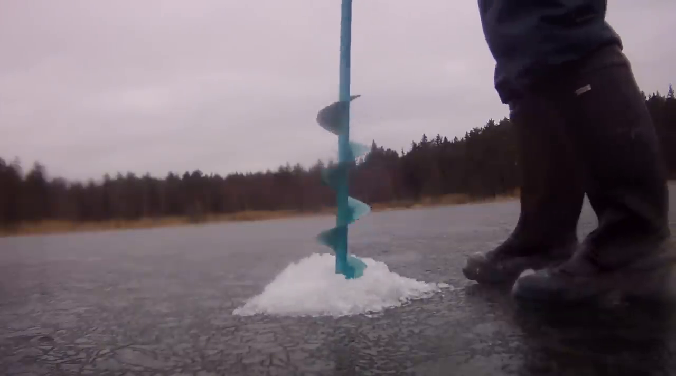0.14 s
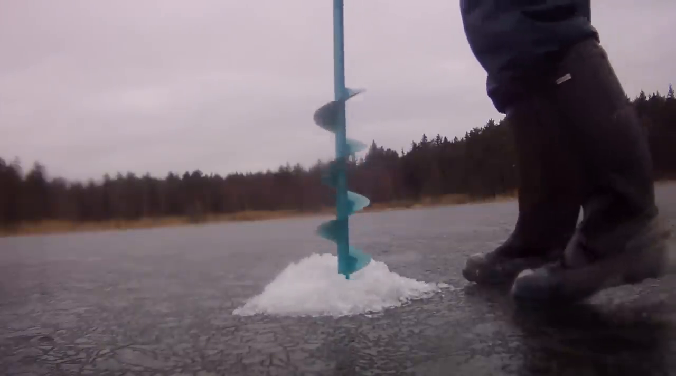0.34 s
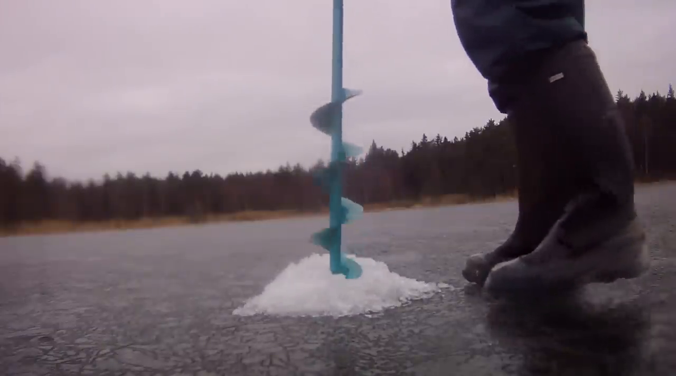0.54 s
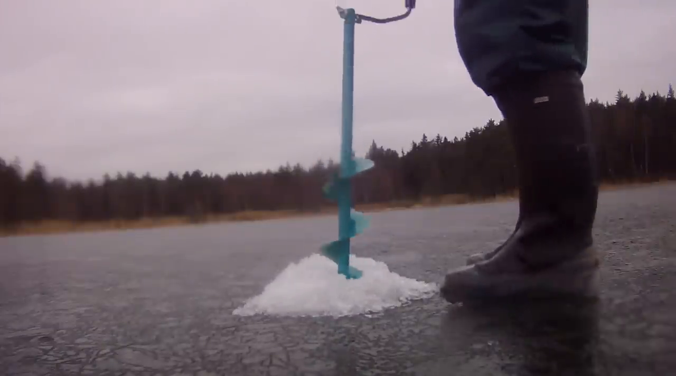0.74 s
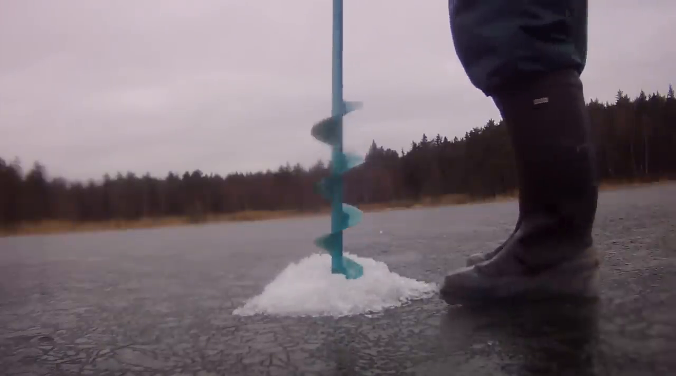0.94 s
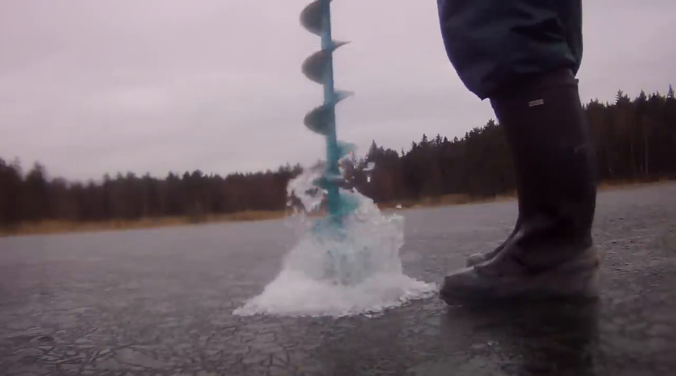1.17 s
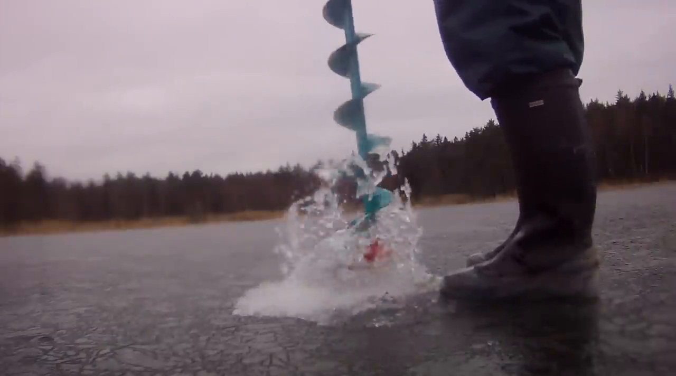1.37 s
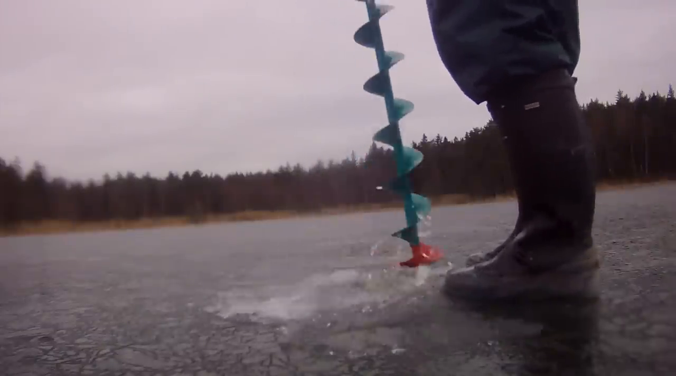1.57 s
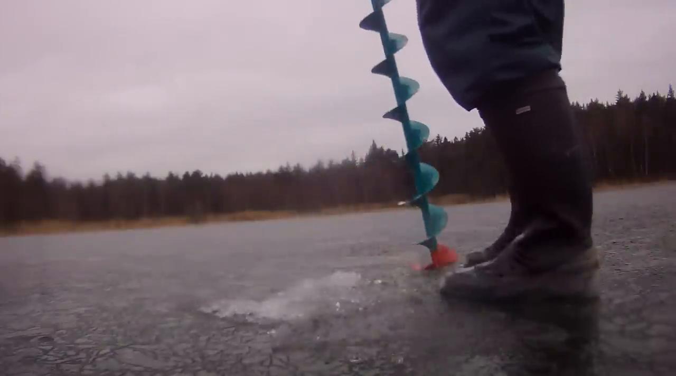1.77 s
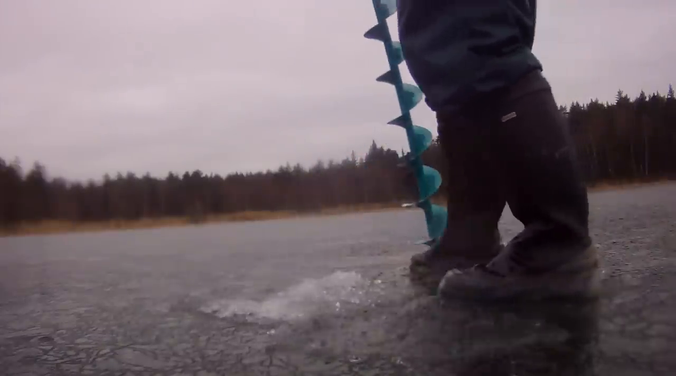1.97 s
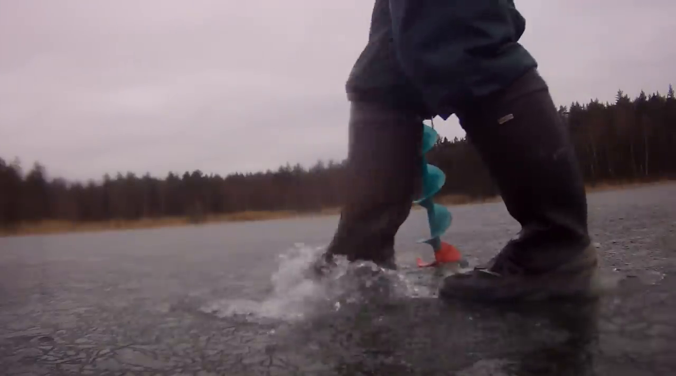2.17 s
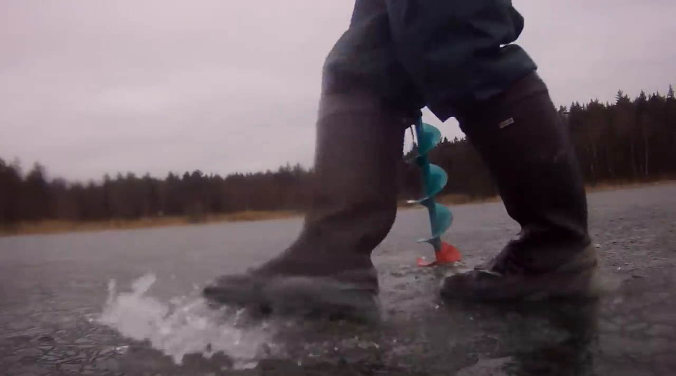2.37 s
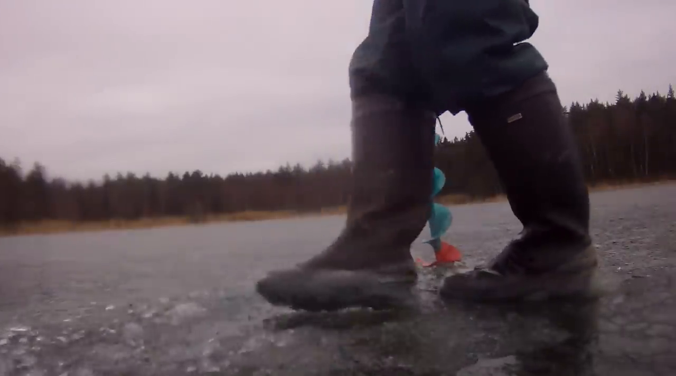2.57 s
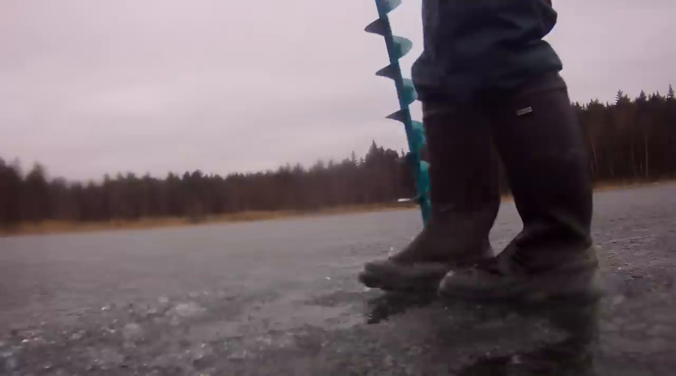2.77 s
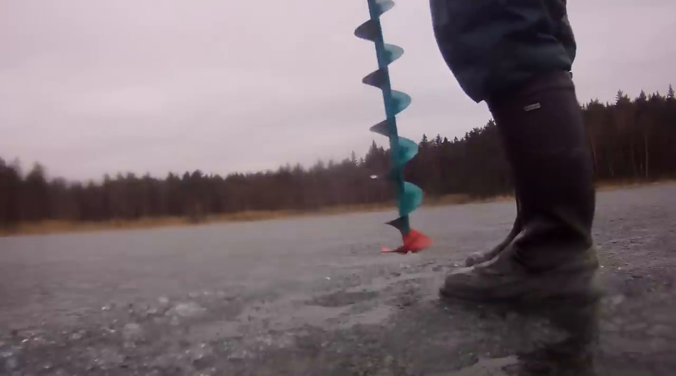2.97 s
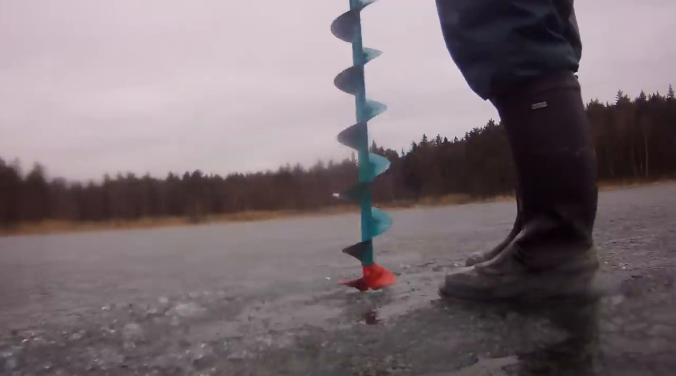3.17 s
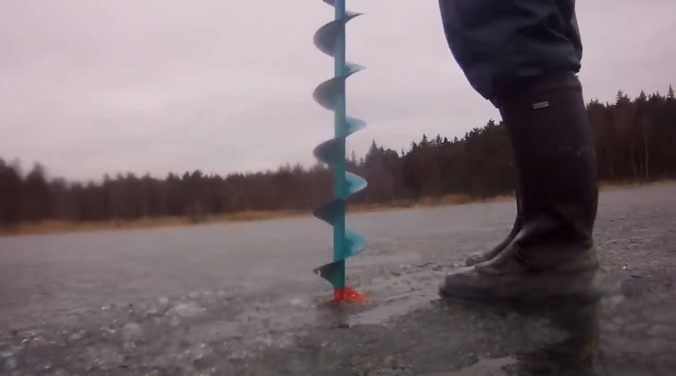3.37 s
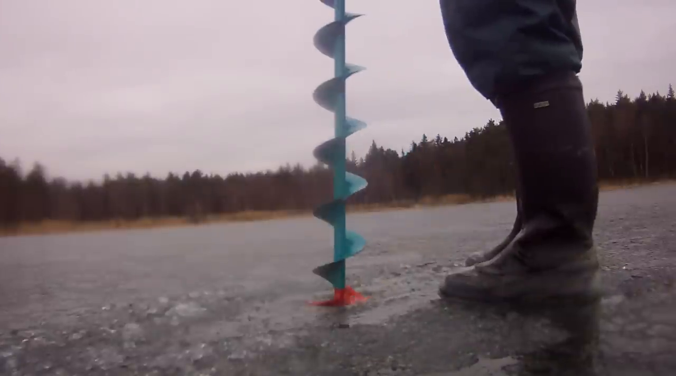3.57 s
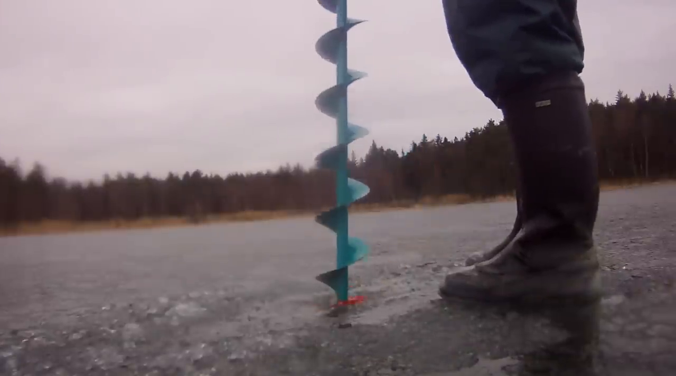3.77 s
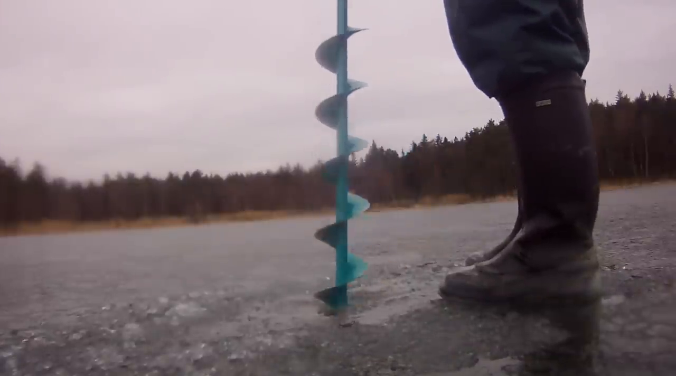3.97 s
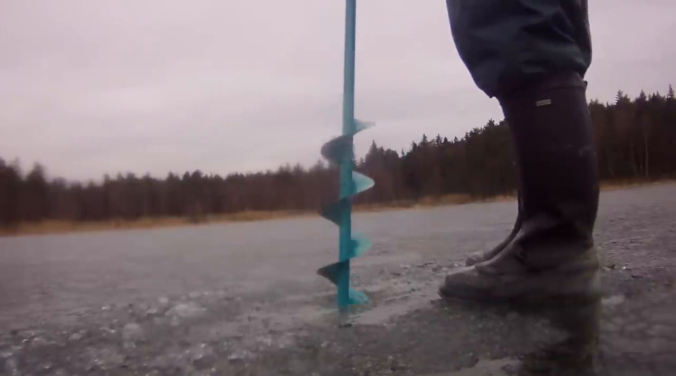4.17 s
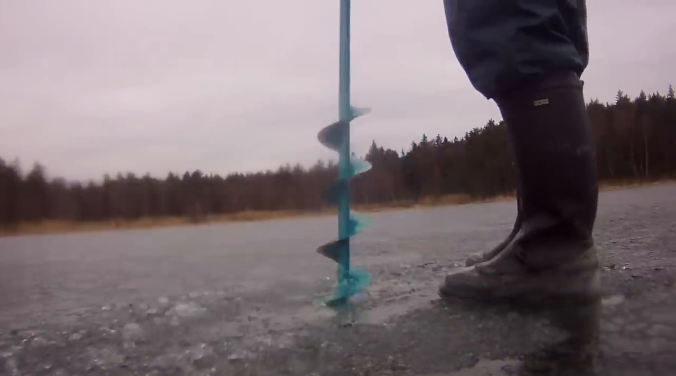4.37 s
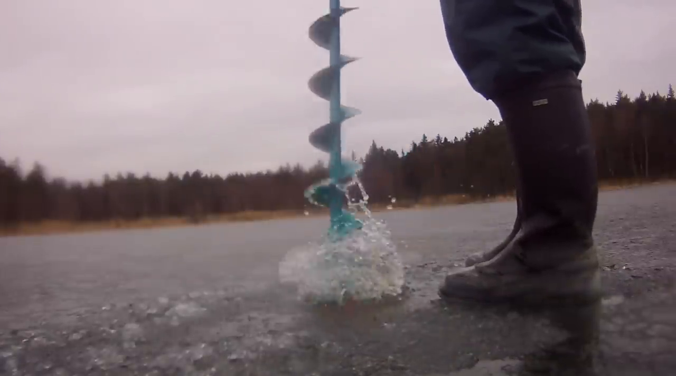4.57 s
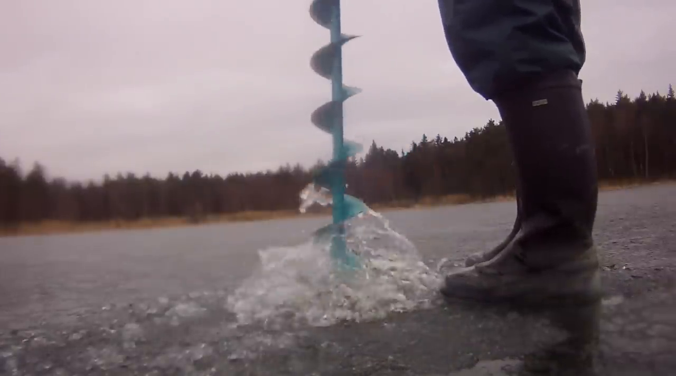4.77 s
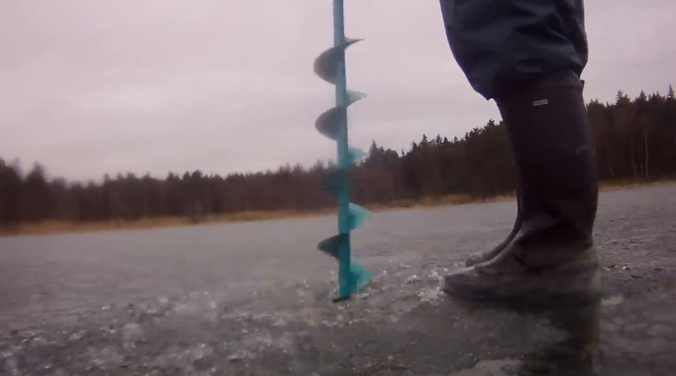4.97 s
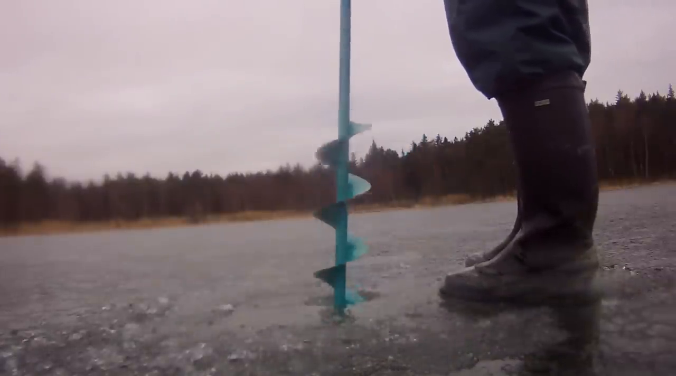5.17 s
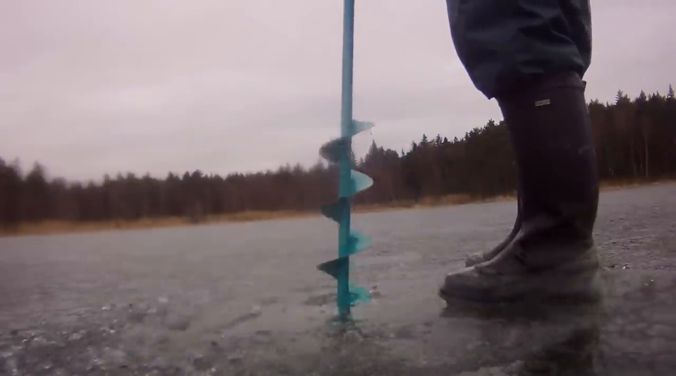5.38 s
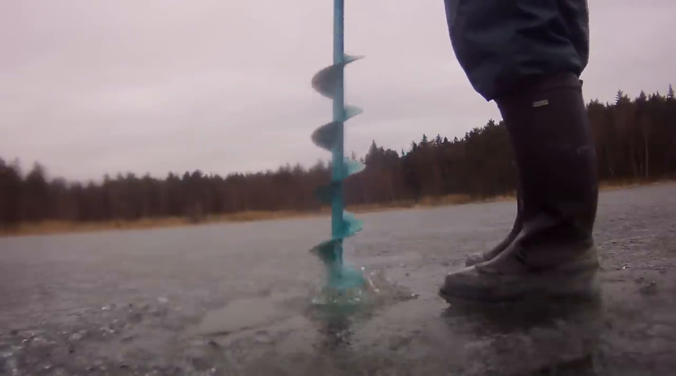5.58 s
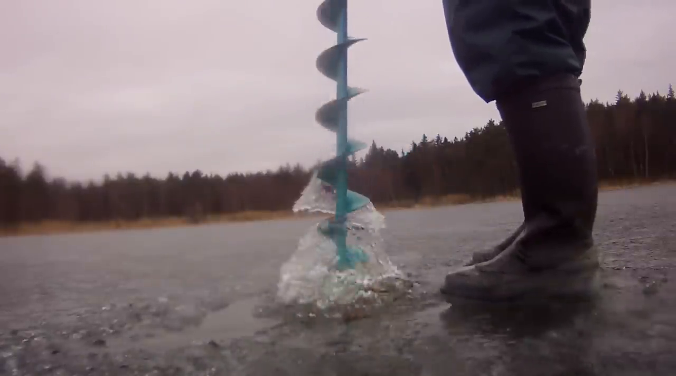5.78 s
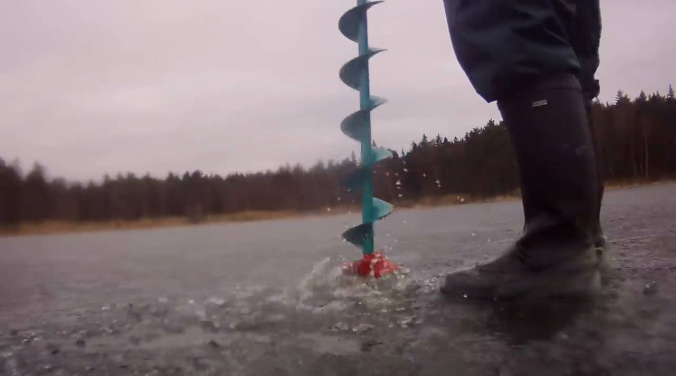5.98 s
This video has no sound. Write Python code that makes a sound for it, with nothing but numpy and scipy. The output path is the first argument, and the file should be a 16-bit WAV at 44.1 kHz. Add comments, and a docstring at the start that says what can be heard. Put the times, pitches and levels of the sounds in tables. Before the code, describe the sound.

Outdoors on a frozen lake, a microphone in a hard case lies on the ice, giving a boxy, resonant colour. Irregular auger bites crunch and thump, water surges out, wet crumbs patter down and dull bumps follow. Quick boot shoves grind and hiss across the surface. The blade then returns with hard steel pings, chipping ice, sloshing and bubbling in the hole.

```python
"""A steel hand auger bites wet lake ice, comes out with a gush, and plunges in again after a boot sweeps slush away.
Each bite is a jolt and a short avalanche of random fractures, filtered into steel ping, crack, chip and crunch.
Blows and noise excite the low modes of the ice sheet; damped tones and random snaps make surging water and drops.
Finer random snaps, shaped by envelopes, give grinding and hissing slush, boot swishes and falling spray.
The camera lies on the ice: its hard case adds resonances to many of these sounds, over still winter air."""
import sys
import numpy as np
from scipy import signal
from scipy.fft import rfft, irfft, next_fast_len
from scipy.io import wavfile
from scipy.ndimage import map_coordinates

SR = 44100
rng = np.random.default_rng(int(sys.argv[2]) if len(sys.argv) > 2 else 0)


def digitize_waveform(pressure):
    """Quantize a signal to 16-bit integers and store it at the path in sys.argv[1].

    Rows of a 2-D input are taken as channels; values are limited to [-1, 1].
    """
    field = np.atleast_2d(pressure).T
    bounded = np.clip(field, -1, 1)
    quanta = np.round(bounded * 32767).astype(np.int16)
    wavfile.write(sys.argv[1], SR, quanta)


N = 265686  # length in samples

# All table levels are relative; the functions below set the final balance.

# Auger blades or boot edge catching in the ice: start_s, ping_db, crack_db, crunch_db, thump_db
BITES = [(0.292, -40.5, -55, -45.5, -32), (0.391, -49.5, -76, -61.5, -46), (0.436, -46.5, -56, -42, -31),
         (0.629, -33.5, -49, -45, -38), (0.6598, -50, -63, -49, -37.5), (0.6969, -47.5, -63, -48, -39),
         (0.7143, -49.5, -63, -63, -32), (0.7444, -56, -74, -51, -60), (0.9177, -46.5, -68, -57, -56),
         (0.9478, -41, -57.5, -42.5, -23.5), (1.011, -53, -59.5, -38.5, -28.5),
         (1.0838, -41.5, -57, -40, -28.5), (1.106, -59, -69, -45, -49), (1.1542, -47.5, -58.5, -35, -27),
         (1.188, -45, -57, -42, -29.5), (2.571, -45, -68, -59, -43.5), (2.8548, -58, -71, -42.5, -50),
         (2.8867, -48, -69, -42.5, -47), (2.955, -60, -74, -46.5, -35.5), (3.415, -46, -57.5, -54.5, -37),
         (3.8017, -45, -66, -57.5, -39), (3.8346, -45, -65, -50.5, -35.5),
         (3.926, -36.5, -54, -48.5, -35.5), (3.9762, -37.5, -58, -47.5, -24.5),
         (3.987, -32.5, -52.5, -43.5, -31.5), (4.0081, -30, -56, -47.5, -30),
         (4.0832, -44, -53.5, -47, -37), (4.1139, -43.5, -54.5, -46, -41.5),
         (4.251, -35.5, -45, -46, -36.5), (4.5012, -50, -49.5, -38, -32), (4.5198, -42, -62, -48, -29.5),
         (4.6277, -52, -60.5, -44, -25), (4.6949, -53, -63, -44, -36), (4.853, -55, -69, -57, -32.5),
         (4.905, -44, -60, -42.5, -41), (4.9514, -41, -57, -47.5, -34.5), (4.977, -37.5, -51, -36.5, -33),
         (4.9934, -44, -63, -45, -57), (5.06, -35, -48, -42, -34.5), (5.086, -47, -54.5, -45.5, -38),
         (5.182, -51.5, -70, -50, -51), (5.24, -43, -53.5, -43.5, -29.5), (5.5944, -54.5, -63, -50, -29.5),
         (5.7185, -49, -53.5, -44.5, -32.5), (5.8588, -44, -66, -45.5, -36.5),
         (5.914, -46, -62, -54.5, -61)]
# Bright steel modes set off by a bite, before their response is compressed: centre_hz, width_hz, level_db
PING_MODES = [(3758, 126, -6.5), (3818, 54, -8), (3960, 95, -9)]
# Force spectra of cracking, crunching and chipping ice: frequency_hz, gain_db
CRACK_SPECTRUM = [(1200, -37), (2600, -18.5), (3200, -2.5), (3800, -15), (4500, 0.5), (6500, -1),
                  (9000, -3), (12000, -10.5), (15000, -17)]
CRUNCH_SPECTRUM = [(150, -19), (330, -5), (750, 3.5), (1150, -4), (1600, -18), (2700, -49), (5000, -37)]
CHIP_SPECTRUM = [(700, -20), (1300, -2), (1600, -0.5), (1950, 5), (2350, -4), (2900, -7.5), (5000, -17.5)]
# Loose chips of ice that snap and tick: start_s, level_db, pitch_hz
CHIPS = [(0.1652, -54.5, 1580), (0.3464, -52, 1660), (0.633, -41, 2240), (2.18, -49, 1630),
         (2.802, -47, 1600), (3.995, -41, 1910), (4.205, -44, 1640), (4.866, -41.5, 1690),
         (5.1204, -45.5, 1530), (5.24, -40.5, 1750), (5.7513, -41.5, 1480)]
# Ring of the camera case, added to the plain response: centre_hz, width_hz, level_db
CASE_MODES = [(403, 230, 9), (573, 9.2, 11), (880, 86, 5.5), (1136, 39, 15.5), (1548, 77, 19.5),
              (1674, 86, 21.5), (1880, 14, 19), (2262, 55, 22.5), (2760, 60, 16), (3098, 40, 21.5),
              (3657, 65, 26), (3902, 92, 27), (4337, 107, 19.5), (5410, 39, 16.5), (5900, 89, 15),
              (6460, 58, 14), (6820, 110, 11), (8300, 270, 7)]

# Low modes of the ice and the camera on it: centre_hz, width_hz, level_db
SHEET_MODES = [(137.8, 13.6, 3), (171.7, 8.2, 3), (247, 4.8, -8.5)]
# Spectrum of the slow sway of the sheet: frequency_hz, gain_db
HEAVE_SPECTRUM = [(12, -5), (28, -4), (45, -7.5), (65, 2), (85, -3), (105, -6.5), (160, -29), (400, -67.5)]
# Dull bumps of boots and auger on the ice: start_s, level_db
THUDS = [(0.1638, -39.5), (1.2981, -34.5), (1.827, -32), (1.9439, -39.5), (2.6211, -35.5), (2.8126, -34.5),
         (3.3136, -38.5), (3.4415, -40), (4.411, -40), (4.6117, -33), (4.6546, -27.5), (5.7519, -31)]
# Sway of the whole sheet under a hard push or pull: start_s, level_db
HEAVES = [(0.437, -34), (1.1528, -25.5), (1.187, -32.5), (2.8118, -47), (3.031, -48), (3.3127, -49.5),
          (3.4414, -40), (3.735, -47.5), (3.8343, -44), (4.907, -38.5), (4.9944, -35)]
# Rumble of the sheet as the man shifts his weight: start_s, end_s, level_db
SHUFFLES = [(0.02, 0.2, -57), (0.75, 0.88, -58.5), (1.2, 1.31, -44), (1.86, 2.05, -49.5), (2.12, 2.34, -50),
            (2.55, 2.82, -49.5), (2.95, 3.05, -54.5), (3.33, 3.5, -55.5), (3.76, 3.93, -55.5),
            (5.26, 5.37, -53.5)]

# Water surging out of the hole or washing over the ice: start_s, end_s, level_db
GUSHES = [(0.085, 0.125, -68), (0.445, 0.49, -66), (1.148, 1.2, -50.5), (1.287, 1.335, -52),
          (2.2, 2.29, -55), (2.79, 2.83, -50.5), (2.875, 3.01, -49), (3.98, 4.02, -45.5), (4.12, 4.3, -63),
          (4.613, 4.71, -45), (4.844, 5, -54), (5.43, 5.47, -64), (5.723, 5.92, -50.5)]
# Spectra of sloshing water and flung drops: frequency_hz, gain_db
WATER_SPECTRUM = [(150, -12.5), (350, -1), (600, -2), (900, 2), (1400, -7.5), (2500, -24)]
DROP_SPECTRUM = [(600, -8), (1600, 4), (2400, -9), (3800, -10), (7000, -20), (12000, -25)]
# Large single bubbles in the hole: start_s, pitch_hz, level_db, life_s
GULPS = [(0.952, 726, -26.5, 0.0047), (0.944, 1107, -38.5, 0.017), (1.158, 568, -35, 0.023),
         (1.305, 887, -49, 0.034), (4.224, 403, -39.5, 0.021), (4.415, 1112, -46, 0.011),
         (4.640, 840, -37, 0.031), (4.990, 645, -40.5, 0.017), (5.600, 561, -50, 0.02),
         (5.758, 840, -42, .012), (5.872, 848, -52, 0.029), (5.918, 412, -39, 0.012),
         (5.989, 1110, -45, 0.0096)]

# Auger spiral turning through the slush in the hole: start_s, end_s, level_db
SCRAPES = [(0.09, 0.33, -64.5), (0.66, 0.92, -62), (0.92, 1.33, -62), (3.83, 3.98, -51.5),
           (3.98, 4.27, -52), (4.29, 4.6, -62), (4.62, 4.72, -56), (4.82, 5.08, -50), (5.1, 5.45, -61),
           (5.81, 5.95, -54)]
# Thrown slush raining back on the ice: thickest_s, level_db
SHOWERS = [(1.5, -52), (5.99, -62)]
# Boot shoving slush across the ice: loudest_s, grind_db, swish_db, rise_s, fall_s
SWEEPS = [(2.185, -43, -54, 0.017, 0.036), (2.27, -48, -51.5, 0.047, 0.14), (2.49, -51, -46, 0.043, 0.093),
          (2.68, -61, -59, 0.043, 0.16), (2.803, -37.5, -65, 0.0089, 0.0094),
          (2.895, -42, -58, 0.0075, 0.033), (2.99, -61, -80, .03, 0.018)]
# Spectra of coarse crumbs, fine crystals and the sliding sole: frequency_hz, gain_db
GRIND_SPECTRUM = [(500, -13), (1200, -14), (1700, -3.5), (2300, -16.5), (3200, -54), (6000, -41)]
HISS_SPECTRUM = [(1200, 5.5), (2700, -12.5), (3800, -1), (5000, -9.5), (7000, -4.5), (9500, -12),
                 (15000, -49)]
SWISH_SPECTRUM = [(1000, -13), (2500, -3), (3000, 4), (3800, 2.5), (5000, 4), (7200, -4.5), (10000, -3),
                  (15000, -12)]
# Spectrum of still air and microphone hiss: frequency_hz, gain_db
AIR_SPECTRUM = [(20, 14), (60, 1.5), (160, -13), (300, -15.5), (1000, -21.5), (3000, -24), (8000, -29.5),
                (15000, -30.5)]

BITE_S, BITE_RISE_S = 0.021, 0.004  # base decay and rise times of the breaking ice
CHIP_STEEL_SHARE = 0.24  # dB of chip per dB by which steel exceeds crunch
CHIP_HZ, CHIP_OCTAVES_PER_DB = 1570, 0.06  # pitch at equal steel and crunch, and its rise with that excess
HEAVE_UNDER_THUMP_DB, SWAY_DB = -11, -10  # sway of each thump, and of the loaded sheet against its ring
SHUFFLE_RISE_S, SHUFFLE_FALL_S = 0.051, 0.027
SCRAPE_RUMBLE_DB, GUSH_RUMBLE_DB, REST_RUMBLE_DB = -3, 0, -66.5
GUSH_RISE_S, GUSH_FALL_S = 0.012, 0.024
RUNOFF_DB, RUNOFF_S, LAPPING_DB, SPLASH_DB = -29, 0.067, -70, -11
SCRAPE_RISE_S, SCRAPE_FALL_S, SCRAPE_HISS_DB = 0.011, 0.033, -2.5
SHOWER_RISE_S, SHOWER_FALL_S, SHOWER_GRIND_DB = 0.22, 0.3, -1.5
GRIND_DB, HISS_DB, SWEEP_HISS_DB = -7.5, -3.5, -2
CLUMP_HZ, CLUMP_DB = 45, 1.5  # knots per second and depth of the random clumping
TOP_HZ = 15350  # upper band limit


def amp(db):
    """Level: twenty decibels are a factor of ten in amplitude."""
    return 10 ** (np.asarray(db) / 20)


def unit(x):
    """Normalisation: equal mean power gives every signal an rms of 1."""
    return x / np.sqrt(np.mean(x ** 2) + 1e-20)


def slope(points):
    """Spectral envelope: decibel gain interpolated over log frequency, flat beyond the end points."""
    f, db = np.transpose(points)
    return lambda hz: amp(np.interp(np.log(hz + 1), np.log(f), db))


def wobble(rate):
    """Slow random modulation: a smooth curve through Gaussian knots, rate per second."""
    knots = rng.standard_normal(int(N * rate / SR) + 4)
    return map_coordinates(knots, [np.arange(N) * rate / SR])


def resonance(modes, hz):
    """Modal superposition: the power responses of damped resonators add."""
    power = 0
    for centre, width, db in modes:
        damping = (hz * width) ** 2
        power = power + amp(db) ** 2 * damping / ((centre * centre - hz * hz) ** 2 + damping)
    return power


def in_case(points):
    """Resonant transmission: the case modes add power to a force spectrum."""
    return lambda hz: slope(points)(hz) * np.sqrt(1 + resonance(CASE_MODES, hz))


def impulse(gain, size=16384):
    """Minimum phase: folding the cepstrum makes a causal response of energy 1 from a gain curve."""
    cepstrum = irfft(np.log(gain(np.fft.rfftfreq(size, 1 / SR)) + 1e-6))
    cepstrum[1:size // 2] *= 2
    cepstrum[size // 2 + 1:] = 0
    response = irfft(np.exp(rfft(cepstrum)))[:size // 2]
    return response / np.linalg.norm(response)


def through(x, gain):
    """Linear filtering: convolution with the causal response of a gain curve."""
    return signal.fftconvolve(x, impulse(gain))[:N]


def fractures(rate, spread_db, size):
    """Random fracture: snaps fall at random, rate per second, a few much larger than the rest."""
    sizes = amp(spread_db * np.minimum(rng.exponential(size=size), 4))
    happens = rng.random(size) < rate / SR
    return happens * rng.standard_normal(size) * sizes


def bursts(times, levels, paths, rate, length_s, rise_s, jolt):
    """Impact excitation: a jolt and an avalanche of fractures ring through a shared path or their own."""
    out = np.zeros(N + SR)
    t = np.arange(SR // 8) / SR
    envelope = (1 - np.exp(-t / rise_s)) * np.exp(-(t / length_s) ** 2)
    paths = np.broadcast_to(paths, (len(times), np.shape(paths)[-1]))
    for s, db, path in zip(times, levels, paths):
        force = envelope * fractures(rate, spread_db=2, size=len(t))
        force /= np.linalg.norm(force) + 1e-12
        force[int(rise_s * SR)] += jolt
        ring = signal.fftconvolve(force, path)
        out[int(s * SR):][:len(ring)] += amp(db) * unit(ring)
    return out[:N]


def strokes(rows, rise_s, fall_s):
    """Sustained excitation: each row rises linearly around its start, holds, and decays after its end."""
    t = np.arange(N) / SR
    total = 0
    for start, end, db in rows:
        rise = np.clip((t - start) / rise_s + 0.5, 0, 1)
        fall = np.exp(-np.maximum(t - end, 0) / fall_s)
        total = total + amp(db) * rise * fall
    return total


def swell(s, db, rise_s, fall_s):
    """Exponential growth and decay: the envelope peaks at one moment."""
    t = np.arange(N) / SR - s
    return amp(db) * np.exp(-np.abs(t) / np.where(t < 0, rise_s, fall_s))


def auger():
    """Brittle fracture under a blade: at every bite the steel pings and the ice cracks, chips and crunches."""
    s, ping_db, crack_db, crunch_db, _ = np.transpose(BITES)
    hardness_db = ping_db - crunch_db
    chip_db = crunch_db + CHIP_STEEL_SHARE * hardness_db
    # more steel and less crunch means a smaller, higher chip
    chip_hz = CHIP_HZ * 2 ** (CHIP_OCTAVES_PER_DB * hardness_db)
    chip_paths = [chip_path(hz) for hz in chip_hz]
    ping_path = impulse(lambda hz: resonance(PING_MODES, hz) ** 0.74)
    ping = bursts(s, ping_db - 21.5, ping_path,
                  rate=1800, length_s=0.82 * BITE_S, rise_s=BITE_RISE_S, jolt=0.66)
    crack = bursts(s, crack_db - 15.0, impulse(in_case(CRACK_SPECTRUM)),
                   rate=4100, length_s=0.92 * BITE_S, rise_s=0.0032, jolt=0.2)
    chip = bursts(s, chip_db - 16.5, chip_paths,
                  rate=2000, length_s=BITE_S, rise_s=0.001883, jolt=0.17)
    crunch = bursts(s, crunch_db - 18.5, impulse(in_case(CRUNCH_SPECTRUM)),
                    rate=2500, length_s=1.22 * BITE_S, rise_s=0.00604, jolt=0.3)
    return ping + crack + chip + crunch


def chip_path(pitch_hz, width_hz=520):
    """Size sets pitch: a breaking chip rings as one broad, compressed resonance heard in the case."""
    def gain(hz):
        return resonance([(pitch_hz, width_hz, 0)], hz) ** 0.7 * in_case(CHIP_SPECTRUM)(hz)
    return impulse(gain, size=4096)


def loose_chips():
    """Brittle release: a single chip breaks away with a short, pitched tick."""
    s, db, pitch_hz = np.transpose(CHIPS)
    paths = [chip_path(hz) for hz in pitch_hz]
    return bursts(s, db - 17.0, paths, rate=2200, length_s=0.014, rise_s=0.00209, jolt=0.4)


def in_sheet(hz, edge_hz=270):
    """Plate modes: the low ring of the ice sheet falls off steeply above its modes."""
    return np.sqrt(resonance(SHEET_MODES, hz) / (1 + (hz / edge_hz) ** 10))


def sheet(scrape, surge):
    """Forced plate vibration: blows thump and sway the ice; scraping, water and shifting feet make it rumble."""
    blows = [(s, db) for s, *_, db in BITES] + THUDS
    s, thump_db = np.transpose(blows)
    thump = bursts(s, thump_db - 19.5, impulse(in_sheet),
                   rate=1900, length_s=0.029, rise_s=0.0014, jolt=1.23)

    blow_heaves = [(s, db + HEAVE_UNDER_THUMP_DB) for s, db in blows]
    s, heave_db = np.transpose(blow_heaves + HEAVES)
    heave = bursts(s, heave_db - 10.5, impulse(slope(HEAVE_SPECTRUM)),
                   rate=1000, length_s=0.037, rise_s=0.0044, jolt=0.99)

    load = strokes(SHUFFLES, SHUFFLE_RISE_S, SHUFFLE_FALL_S) + amp(REST_RUMBLE_DB)
    load = load + amp(SCRAPE_RUMBLE_DB) * scrape + amp(GUSH_RUMBLE_DB) * surge
    ring = unit(through(rng.standard_normal(N), in_sheet))
    sway = unit(through(rng.standard_normal(N), slope(HEAVE_SPECTRUM)))
    rumble = (ring + amp(SWAY_DB) * sway) * load * amp(-2.5 + 1.35 * wobble(13))
    return thump + heave + rumble


def bubbles(rate, centre_hz, spread, cycles, size_db):
    """Bubble resonance: damped tones rise in pitch as each bubble nears the surface."""
    draws = rng.random((int(rate * N / SR), 4))
    start, pitch, pitch_scatter, strength = draws.T[:, :, None]
    hz = centre_hz * np.exp(2 * spread * (pitch + pitch_scatter - 1))
    t = np.arange(SR // 30) / SR
    age = t * hz / cycles
    level = amp(-size_db * np.log(strength + 0.0072))  # few bubbles are loud
    tone = np.sin(2 * np.pi * hz * t * (1 + 0.04 * age)) * np.exp(-age) * level
    where = (start * N).astype(int) + np.arange(len(t))
    return unit(np.bincount(where.ravel(), tone.ravel(), N)[:N])


def water(surge):
    """Entrained air and impact: each surge gurgles, slaps and flings drops, then runs back into the hole."""
    runoff = amp(RUNOFF_DB) * strokes(GUSHES, GUSH_RISE_S, RUNOFF_S)
    gurgle = bubbles(rate=380, centre_hz=723.7, spread=0.444, cycles=9.44, size_db=2.5)
    slap = unit(through(fractures(1500, spread_db=2.0, size=N), slope(CRUNCH_SPECTRUM)))
    drops = unit(through(fractures(500, spread_db=2.5, size=N), in_case(DROP_SPECTRUM)))
    slosh = unit(through(gurgle + 0.48 * slap, in_case(WATER_SPECTRUM)))
    flow = surge + runoff + amp(LAPPING_DB)  # the water never quite settles
    return slosh * flow + drops * surge * amp(SPLASH_DB)


def gulps():
    """Cavity closure: big bubbles in the hole ring briefly, their pitch creeping up."""
    out = np.zeros(N + SR)
    t = np.arange(SR // 5) / SR
    for s, hz, db, life in GULPS:
        age = t / max(life, 0.003)
        envelope = (1 - np.exp(-t / 0.002)) * np.exp(-age)
        tone = np.sin(2 * np.pi * hz * t * (1 + 0.009 * age)) * envelope
        out[int(s * SR):][:len(t)] += amp(db) * tone
    return out[:N]


def slush(scrape):
    """Granular friction: under spiral, boot and spray, wet crumbs grind in clumps and finer crystals hiss."""
    shower = sum(swell(s, db, SHOWER_RISE_S, SHOWER_FALL_S) for s, db in SHOWERS)
    shove = sum(swell(s, db, rise, fall) for s, db, _, rise, fall in SWEEPS)
    coarse = scrape + amp(SHOWER_GRIND_DB) * shower + shove
    fine = amp(SCRAPE_HISS_DB) * scrape + shower + amp(SWEEP_HISS_DB) * sole_slide()
    grind = unit(through(fractures(900, spread_db=1.5, size=N), in_case(GRIND_SPECTRUM)))
    hiss = unit(through(fractures(1500, spread_db=2.5, size=N), in_case(HISS_SPECTRUM)))
    grains = grind * coarse * amp(GRIND_DB) + hiss * fine * amp(HISS_DB)
    return grains * amp(CLUMP_DB * wobble(CLUMP_HZ))


def sole_slide():
    """Sliding friction: the strength of each sweep of the sole grows and dies away."""
    return sum(swell(s, db, rise, fall) for s, _, db, rise, fall in SWEEPS)


def boot():
    """Stick and slip: the sole pushes wet crystals in bright swishes, with a random wobble for the catching."""
    grit = fractures(3000, spread_db=3, size=N) * amp(2.2 * wobble(70))
    return amp(-4) * sole_slide() * unit(through(grit, in_case(SWISH_SPECTRUM)))


def air():
    """Broadband noise: still winter air and the faint hiss of the microphone."""
    return amp(-52) * unit(through(rng.standard_normal(N), slope(AIR_SPECTRUM)))


def scene():
    """Superposition: spiral and water also drive slush and ice sheet, and all sounds add at one microphone."""
    scrape = strokes(SCRAPES, SCRAPE_RISE_S, SCRAPE_FALL_S)
    surge = strokes(GUSHES, GUSH_RISE_S, GUSH_FALL_S)
    ice = auger() + loose_chips() + sheet(scrape, surge)
    wet = water(surge) + gulps() + slush(scrape) + boot()
    return (ice + wet + air())[None]


def record(dry):
    """Band limiting: the camera keeps nothing from its upper limit on."""
    size = next_fast_len(N + SR // 2)
    passband = np.fft.rfftfreq(size, 1 / SR) < TOP_HZ
    return irfft(rfft(dry, size) * passband, size)[:, :N]


dry = scene()
out = record(dry)
digitize_waveform(out)
```